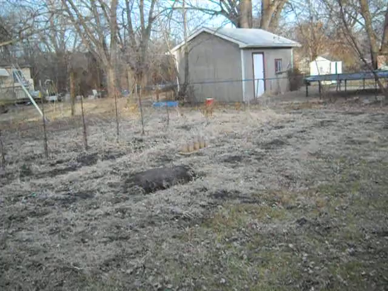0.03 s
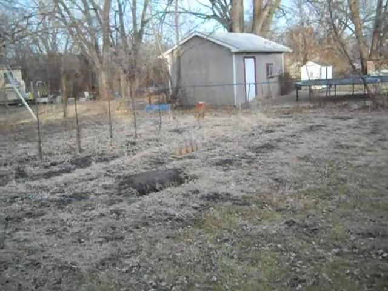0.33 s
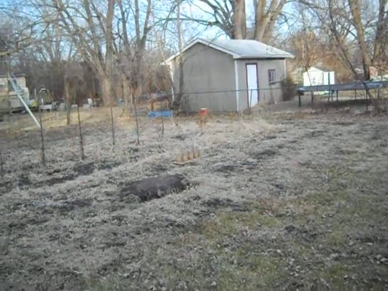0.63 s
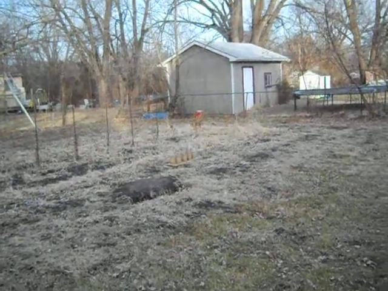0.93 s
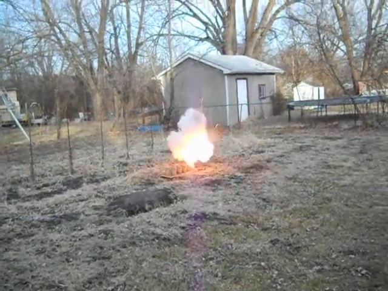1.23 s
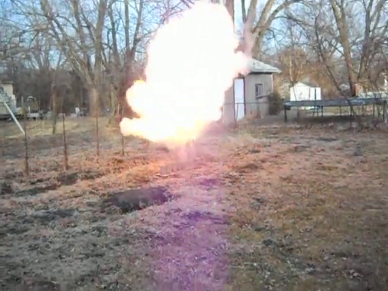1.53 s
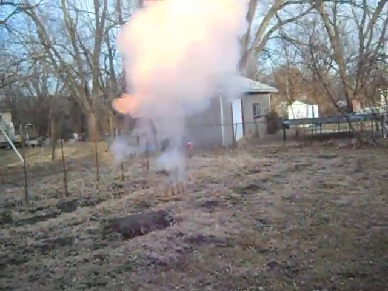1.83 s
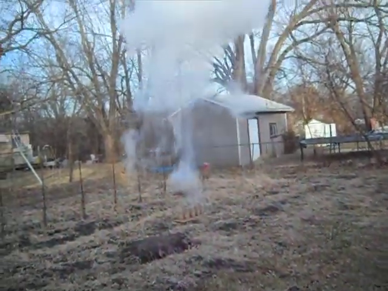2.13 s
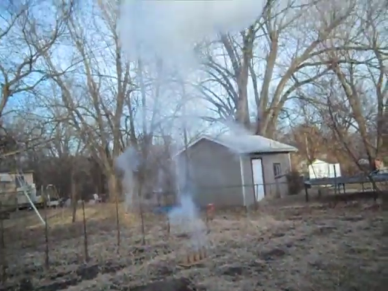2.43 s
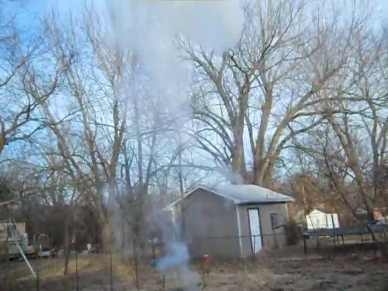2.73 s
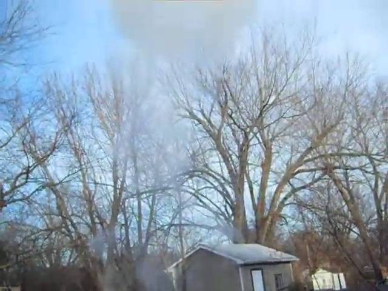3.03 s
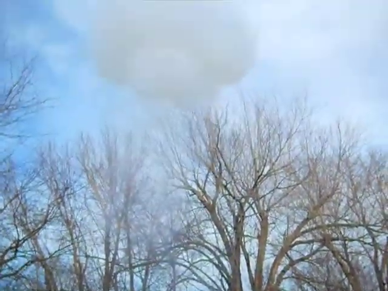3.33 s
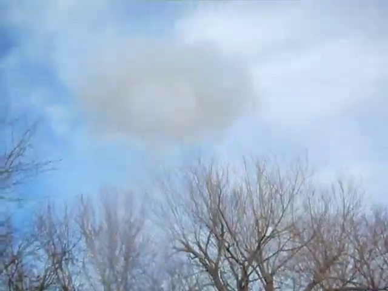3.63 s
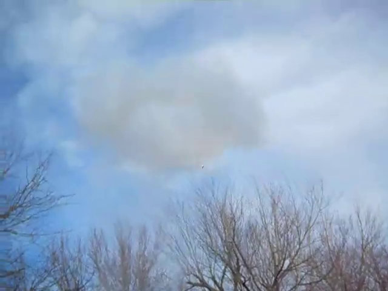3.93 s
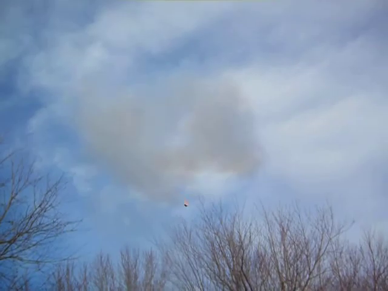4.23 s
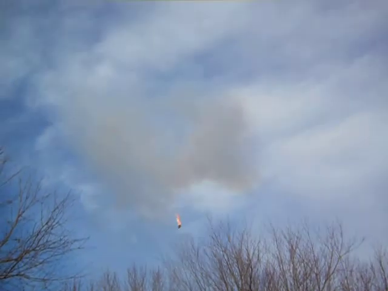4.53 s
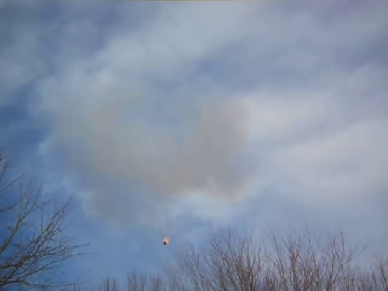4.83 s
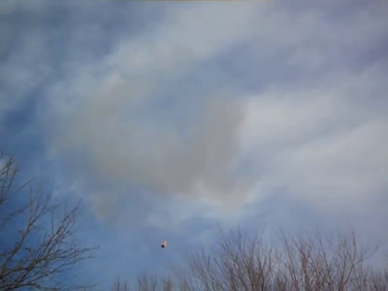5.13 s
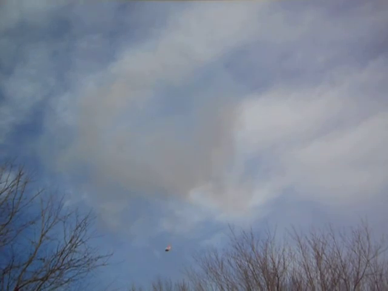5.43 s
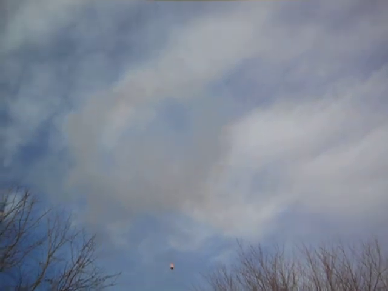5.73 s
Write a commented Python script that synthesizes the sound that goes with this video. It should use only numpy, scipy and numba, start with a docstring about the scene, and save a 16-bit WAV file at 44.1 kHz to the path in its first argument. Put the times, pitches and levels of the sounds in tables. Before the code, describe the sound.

A quiet backyard is heard through a hand-held camera microphone with little treble, under light wind. Dry grass rustles underfoot during the first second, with a small knock of a step at about 0.4 seconds. At about 1.3 seconds a homemade powder charge flares into a fireball: one short, very loud, distorted whump with an instant of hiss, by far the loudest sound. A dull echo from the trees dies away within about a second, while the whole sound ducks sharply. At 2.4 seconds the plastic camera case gives one sharp click. From about 2.6 seconds the background creeps back up: soft wind and the low, slowly throbbing drone of a distant engine, gradually rising in pitch. A soft footstep on hard soil lands at around 4 seconds. Faint wind and engine hum, with a few tiny handling ticks, continue until the end, near 6 seconds.

```python
"""A homemade powder charge flares into a fireball in a backyard: rapidly expanding, turbulent gas
radiates one short, overloading whump, which a shed reflects and the trees scatter.
A far engine slowly gathers speed under light wind; dry grass rustles underfoot and the hand-held
camera's case clicks. The camera's narrow-band sound channel clips the burst; its gain control
then ducks, holds for about a second and creeps back up."""
import sys
import numpy as np
from scipy import signal
from scipy.fft import rfft, irfft
from scipy.io import wavfile
from scipy.ndimage import uniform_filter1d
from numba import njit

SR = 44100
rng = np.random.default_rng(int(sys.argv[2]) if len(sys.argv) > 2 else 0)


def waveform_to_disk(signal):
    """Save audio, clipped to [-1, 1], as 16-bit WAV at the path in sys.argv[1]."""
    frames = np.transpose(np.atleast_2d(signal))
    scaled = np.clip(frames, -1, 1) * 32767
    samples = np.round(scaled).astype(np.int16)
    wavfile.write(sys.argv[1], SR, samples)


N = 258867
T = np.arange(N) / SR

# spectrum of the outdoor air: f/Hz, relative density/dB
AIR_SPECTRUM = [(20, 1.5), (60, 8.5), (100, 3.5), (150, 0.5), (280, -1.5), (400, -4), (600, -4),
                (930, -6.5), (1400, -10), (2500, -12.5), (4000, -16)]
# spectrum of wind eddies at the microphone: f/Hz, relative density/dB
EDDY_SPECTRUM = [(10, 0.5), (22, -3.5), (45, -8.5), (85, -11), (130, -21.5), (250, -33.5), (1000, -59)]
# firing rate of the far engine: t/s, f/Hz
FIRING_RATE = [(0, 35.38), (1.1, 37.5), (1.8, 40.38), (3, 43.45), (4.4, 47.44), (5.87, 50.9)]
# its fundamental, carried on the breeze: t/s, level/dB
DRONE_LEVEL = [(0, -32.5), (1.4, -30), (1.8, -26), (2.8, -24), (3.4, -26.5), (4.05, -30.5), (4.25, -23),
               (4.6, -29), (5.87, -32)]
# its overtones, which follow the load: t/s, level/dB
OVERTONE_LEVEL = [(0, -46), (2.9, -40.5), (3.4, -37.5), (3.9, -34), (4.6, -43), (5.1, -41.5), (5.87, -52)]
# exhaust overtones: multiple of the firing rate, relative level/dB
EXHAUST_HARMONICS = [(2, 1), (3, -12), (4, -8), (5, -12.5), (6, -14.5)]
# spectrum of rustling grass: f/Hz, relative density/dB
GRASS_SPECTRUM = [(100, -8), (500, -1.5), (900, 1.5), (1300, -5), (2200, 1), (3000, -2), (3600, 1),
                  (4000, 2.5)]
# a foot brushing through the grass: t/s, peak level/dB, attack/s, release/s
GRASS_STROKES = [(.22, -33.5, .4, 0.96), (.35, -26, 0.53, .27), (.585, -29, .28, .3),
                 (.81, -41, 0.69, 0.33)]
# a foot set down on hard soil: t/s, level/dB, knock f/Hz
FOOT_IMPACTS = [(0.356, -14.5, 478), (0.3897, -19.5, 560), (3.786, -26.5, 800), (3.989, -17.5, 724),
                (4.010, -23, 785)]
# clicks of the camera case in the hand: t/s, level/dB, centre f/Hz
CASE_CLICKS = [(0.14, -33, 2400), (.161, -33, 2410), (.899, -37, 2890), (1.609, -31.5, 2880),
               (2.401, -14.5, 2900), (2.4055, -7, 2470), (2.4054, -9.5, 730), (2.421, -27, 2600),
               (3.050, -35.5, 2180), (3.275, -35, 2360), (3.320, -31.5, 4080), (4.125, -39.5, 3700),
               (5.258, -36.5, 4100)]
# normal modes of the case: f/Hz, T60/s, relative level/dB
CASE_MODES = [(654, 0.02, 3.5), (814, 0.04, 8), (1030, 0.021, 0.5), (1350, .025, -1), (1800, 0.043, -4),
              (2150, 0.2, -20), (2754, 0.011, -6.5), (3745, .012, -5.5)]
# spectrum of the echo from the trees: f/Hz, relative density/dB
TREE_SPECTRUM = [(25, -3), (100, 0.5), (190, -0.5), (350, -13), (550, -5.5), (1200, -23), (4000, -28.5)]
# resonances of the jet at the charge's opening: f/Hz, width/Hz, relative level/dB
JET_RESONANCES = [(2410, 340, 1), (2835, 300, -4.5), (3284, 346, -7.5)]
# broad noise bands that colour the fireball's dark roar: f/Hz, nominal width/Hz, relative level/dB
ROAR_BANDS = [(122, 70, -5.5), (197.6, 90, 0), (303, 90, -6), (571.6, 190, -0.5), (900, 450, -12.5),
              (1520, 590, -16), (2900, 1800, -10)]

FLARE_PEAK_S = 1.287


def undb(db):
    """Amplitude ratio of a level: a factor of ten per 20 dB."""
    return 10 ** (np.asarray(db) / 20)


def curve(rows):
    """Linear interpolation in time between rows of t/s, value."""
    return np.interp(T, *np.transpose(rows))


def unit(x):
    """Normalisation to rms 1."""
    return x / np.sqrt(np.mean(x ** 2))


def noise(points):
    """Spectral shaping: noise of rms 1 follows points of f/Hz, density/dB and rolls off at both ends."""
    hz, db = np.transpose(points)
    f = np.maximum(np.fft.rfftfreq(N, 1 / SR), 1)
    shape = undb(np.interp(np.log(f), np.log(hz), db))
    roll_off = 1 / np.sqrt((1 + (hz[0] / 2 / f) ** 4) * (1 + (f / 5000) ** 16))
    return unit(irfft(rfft(rng.standard_normal(N)) * shape * roll_off, N))


def resonate(x, hz, width_hz):
    """Resonance: two equal resonators in cascade, each of the given width, with gain 1 at the centre."""
    b, a = signal.iirpeak(hz, hz / width_hz, fs=SR)
    return signal.lfilter(b, a, signal.lfilter(b, a, x))


def band(hz, width_hz):
    """Band-pass filtering of white noise leaves one band, of rms 1."""
    return unit(resonate(rng.standard_normal(N), hz, width_hz))


def walk(rate_hz):
    """Random modulation: chance steps, smoothed twice, of rms 1."""
    span = int(SR / rate_hz)
    steps = np.repeat(rng.standard_normal(N // span + 1), span)[:N]
    return unit(uniform_filter1d(uniform_filter1d(steps, span), span))


def envelope(peak_s, attack_s, hold_s, release_s):
    """Exponential growth to 1, a hold, then exponential decay; attack and release each span 60 dB."""
    before = np.maximum(peak_s - T, 0)
    after = np.maximum(T - peak_s - hold_s, 0)
    return undb(-60 * (before / attack_s + after / release_s))


def passing(nearest_s, spread_s):
    """Inverse-distance law for a source moving past in a straight line: gain 1 when nearest."""
    return 1 / np.hypot(1, (T - nearest_s) / spread_s)


def air(db=-36, gust_db=.5, hiss_db=-52):
    """Ambient noise: light wind and far traffic swell and ease slowly over an even hiss."""
    wind = noise(AIR_SPECTRUM) * passing(2.92, spread_s=3.2) * undb(db + gust_db * walk(7.8))
    return wind + undb(hiss_db) * noise([(200, 0.0018), (4000, 0)])


def gust(db=-41.5):
    """Flow noise: a soft, low rush of wind passes through the branches."""
    return band(310, width_hz=300) * undb(db) * passing(3.3, spread_s=.25)


def buffet(db=-39.5, gust_db=3):
    """Turbulent pressure fluctuation: eddies tumble over the microphone port."""
    return noise(EDDY_SPECTRUM) * undb(db + gust_db * walk(6.9))


def tyres(db=-47):
    """Rolling noise: the far vehicle's tyres radiate one broad band as it goes by."""
    return band(900, width_hz=480) * undb(db) * passing(4.35, spread_s=.6)


def engine(wobble=.004, flutter_db=1, overtone_flutter_db=2, throb_hz=1.78, trough_s=3.632):
    """Periodic firing gives a harmonic series, of which only the lowest orders carry from afar."""
    phase = 2 * np.pi * np.cumsum(curve(FIRING_RATE) * (1 + wobble * walk(12))) / SR
    # the drone throbs slowly, most deeply in mid-run
    depth = .61 * passing(3.35, spread_s=.75) ** 2
    throb = np.abs(1 - depth * np.exp(2j * np.pi * throb_hz * (T - trough_s)))
    drone = unit(np.sin(phase)) * throb * undb(curve(DRONE_LEVEL) + flutter_db * walk(9))
    overtones = sum(undb(db + overtone_flutter_db * walk(9)) * np.cos(order * phase)
                    for order, db in EXHAUST_HARMONICS)
    return drone + unit(overtones) * undb(curve(OVERTONE_LEVEL))


def grass(grain_db=2.5, stir_db=-48, still_s=1.3):
    """Friction: dry blades crackle under a shifting foot; strokes and a faint stirring add in power."""
    stroke_power = sum((undb(db) * envelope(s, attack, 0, release)) ** 2
                       for s, db, attack, release in GRASS_STROKES)
    stirring = undb(stir_db) * envelope(still_s, attack_s=np.inf, hold_s=0, release_s=1.8)
    crackle = unit(noise(GRASS_SPECTRUM) * undb(grain_db * walk(350)))
    return crackle * np.sqrt(stroke_power + stirring ** 2)


def footfalls(knock_t60=.015, grit_db=-11, grit_t60=.02):
    """Impact: the sole lands with a heavily damped knock and a crunch of soil."""
    out = np.zeros(N)
    grit = undb(grit_db) * band(1100, width_hz=2200)
    for s, db, hz in FOOT_IMPACTS:
        age = np.maximum(T - s, 0)
        knock = np.sin(2 * np.pi * hz * age) * undb(-60 * age / knock_t60)
        crunch = grit * undb(-60 * age / grit_t60)
        out += (T >= s) * undb(db) * (knock + crunch)
    return out


def clicks(contact_t60=.0077, ring_db=-35, contact_q=1.14, lowest_hz=580):
    """Modal ringing: tiny scrapes excite the plastic case, which is too small to radiate bass."""
    out, t = np.zeros(N), T[:SR // 10]
    ring = sum(undb(db - 60 * t / t60) * np.cos(2 * np.pi * hz * t) for hz, t60, db in CASE_MODES)
    radiation = signal.butter(6, [lowest_hz, 5000], "band", fs=SR, output="sos")
    for s, db, hz in CASE_CLICKS:
        scrape = rng.standard_normal(len(t)) * undb(-60 * t / contact_t60)
        contact = resonate(scrape, hz, hz / contact_q)
        ringing = undb(ring_db) * signal.fftconvolve(contact, ring)[:len(t)]
        click = signal.sosfilt(radiation, contact + ringing)
        rms = np.sqrt(np.sum(click ** 2) / (SR * .005))  # its energy spread over 5 ms
        start = int(s * SR)
        out[start:start + len(t)] += undb(db) * click / rms
    return out


def trees(db=-29, build_s=.16, t60=1.8, patchy_db=2):
    """Scattering: trunks and houses return the burst as a dull, uneven reverberant tail."""
    age = np.maximum(T - FLARE_PEAK_S, 0)
    build_up = np.minimum(age / build_s, 1)
    decay_db = 60 * np.maximum(age - build_s, 0) / t60
    return noise(TREE_SPECTRUM) * build_up * undb(db - decay_db + patchy_db * walk(25))


def puff(db=-20):
    """Air flow travels slower than sound: a soft puff reaches the microphone after the burst."""
    return band(16, width_hz=30) * undb(db) * envelope(1.47, attack_s=.097, hold_s=0, release_s=1.4)


def jet(db=-17, peak_s=1.281, spread_s=.0065):
    """Jet noise: gas whistles through the resonant opening of the charge for an instant."""
    hiss = rng.standard_normal(N)
    whistle = sum(undb(level) * resonate(hiss, hz, width) for hz, width, level in JET_RESONANCES)
    burst = np.exp(-.5 * ((T - peak_s) / spread_s) ** 2)
    return undb(db) * whistle * burst / np.sqrt(np.average(whistle ** 2, weights=burst ** 2))


def thump(db=-6, swell_s=.003, echo_s=.024, echo_db=-13):
    """Monopole radiation: the gas swells and stops, giving one pressure swing that the shed reflects."""
    ages = ((T - FLARE_PEAK_S - lag) / swell_s for lag in (0, echo_s))
    direct, reflected = (age * np.exp((1 - age ** 2) / 2) for age in ages)
    return undb(db) * (direct + undb(echo_db) * reflected)


def combustion(flash_s=1.2675, lead_s=.0155, attack_s=.031, release_s=.028, sag_db_per_s=212):
    """Deflagration envelope: ignition fizzes, the charge catches all at once, the rest burns off."""
    fizz = undb(-34) * envelope(flash_s - lead_s, attack_s=.018, hold_s=lead_s, release_s=release_s)
    flash = undb(.5) * envelope(flash_s, attack_s, hold_s=.005, release_s=release_s)
    sag_db = sag_db_per_s * np.maximum(T - flash_s, 0)
    afterburn = undb(-9 - sag_db) * envelope(flash_s, attack_s, hold_s=.057, release_s=.115)
    return np.max([fizz, flash, afterburn], axis=0)


def roar(flutter_db=1, broadening=1.51):
    """Combustion noise: turbulent gas leaves the charge as strongly as it burns."""
    burn = combustion()
    gas = np.zeros(N)
    for hz, width, db in ROAR_BANDS:
        eddies = band(hz, broadening * width) * undb(flutter_db * walk(400))
        # each band takes a set share of the roar's energy
        gas += undb(db) * eddies / np.sqrt(np.average(eddies ** 2, weights=burn ** 2))
    running_rms = np.sqrt(uniform_filter1d(gas ** 2, size=1100))  # over 25 ms
    return burn * gas / running_rms


def scene():
    """Superposition: the pressures of the fireball and the yard around it add at one microphone."""
    fireball = roar() + jet() + thump() + trees()
    yard = engine() + tyres() + air() + gust() + buffet()
    handling = grass() + footfalls() + clicks()
    return (fireball + yard + handling + puff())[None]


@njit
def gain_control(x, limit, low_gain, fall_s, hold_s, rise_s):
    """Feedback: an overload drives the gain toward its low value for the hold time; then it recovers."""
    y, gain, wait_s = np.empty(len(x)), 1., 0.
    for i in range(len(x)):
        y[i] = gain * x[i]
        wait_s = hold_s if abs(y[i]) > limit else wait_s - 1 / SR
        if wait_s > 0:
            gain += (low_gain - gain) / (fall_s * SR)
        else:
            gain += (1 - gain) / (rise_s * SR)
    return y


def record(dry, open_s=.072, duck_db=-23, ceiling=.71, top_hz=16000):
    """Nonlinear distortion: after gain control and a narrow pass band, clipping adds treble."""
    x = dry[0] * (T > open_s)  # silence until the channel opens
    x = gain_control(x, limit=.5, low_gain=float(undb(duck_db)), fall_s=.11, hold_s=1.213, rise_s=.96)
    edge_hz, edge_db = [3700, 4020, 4300, 4600, 5000], [0, -17, -16.5, -50, -100]
    pass_band = undb(np.interp(np.fft.rfftfreq(N, 1 / SR), edge_hz, edge_db))
    narrow = irfft(rfft(x) * pass_band, N)
    clipped = np.clip(narrow, -ceiling, ceiling)
    low_pass = signal.ellip(8, .2, 70, top_hz, fs=SR, output="sos")
    return signal.sosfilt(low_pass, clipped)[None]


dry = scene()
out = record(dry)
waveform_to_disk(out)
```